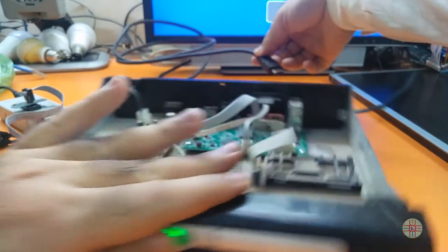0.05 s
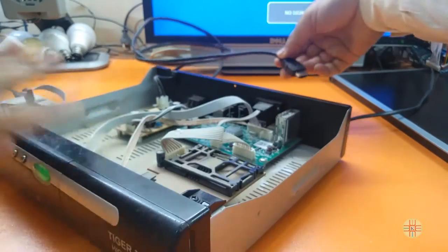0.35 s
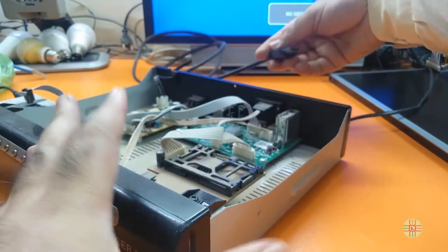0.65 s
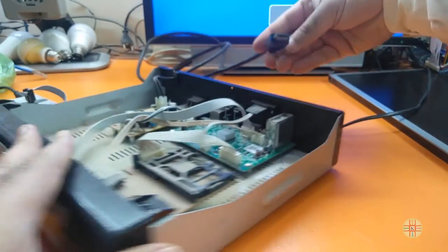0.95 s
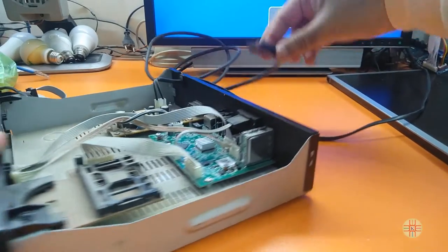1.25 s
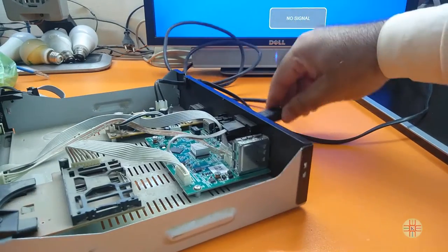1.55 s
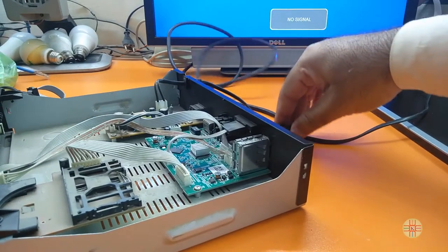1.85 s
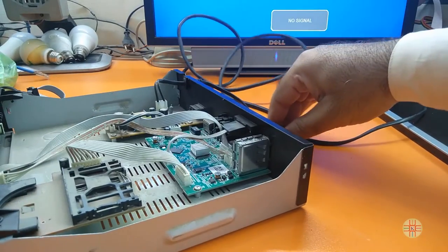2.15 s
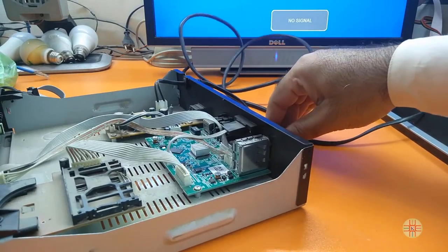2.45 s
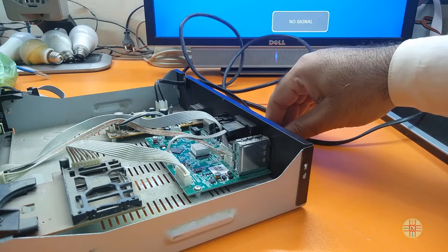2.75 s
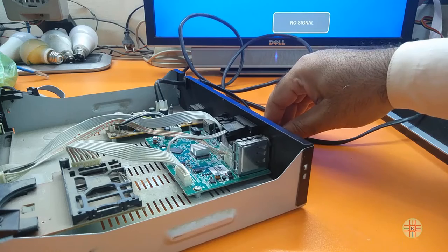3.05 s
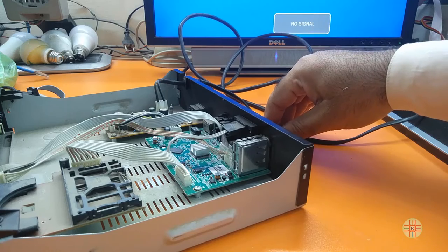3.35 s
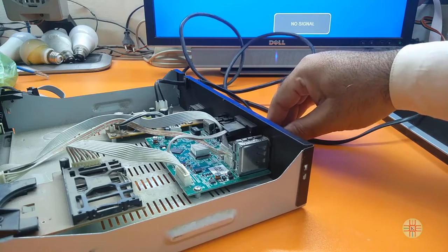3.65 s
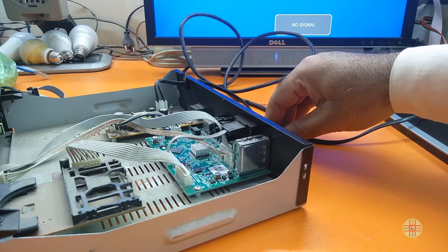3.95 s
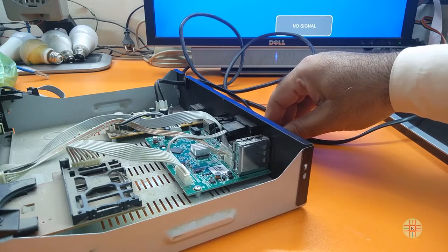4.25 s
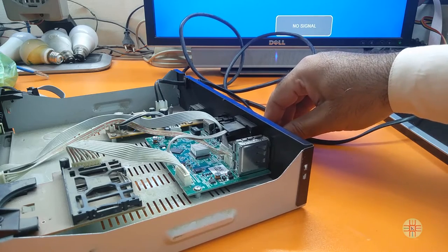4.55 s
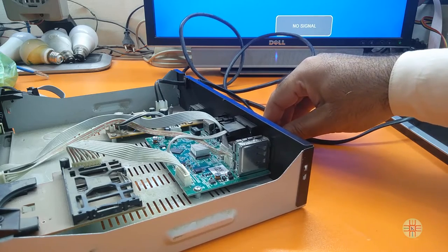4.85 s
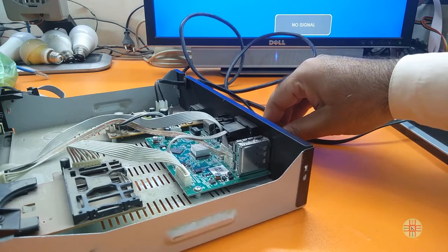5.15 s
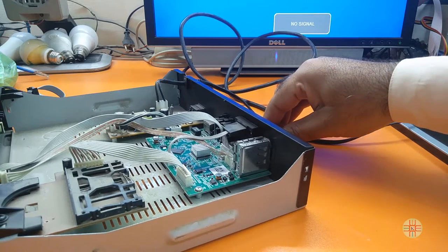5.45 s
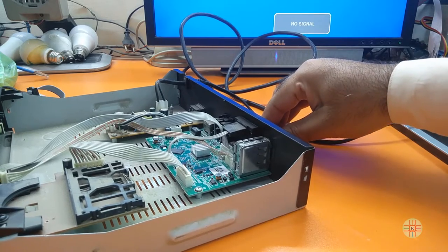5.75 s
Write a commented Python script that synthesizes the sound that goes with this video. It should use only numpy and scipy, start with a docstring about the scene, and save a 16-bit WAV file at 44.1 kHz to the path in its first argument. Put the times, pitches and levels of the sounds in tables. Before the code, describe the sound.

Close up in a small, quiet room, a thin metal case is shoved round on a bench in two short scrapes, with clattering knocks and a brief ring. Muffled thumps come through the microphone stand. After that, a metal plug feels for its socket with sparse, light taps and scuffs, ending in a sharper click and a low knock over faint handling rumble.

```python
"""Receiver turned and plugged in

An opened sheet-steel receiver is turned on a laminate bench in a small room. Its feet scrape and
judder; the chassis drops, rattles and rings. Dull bumps reach the microphone through its holder.
A plug ticks along the back panel, feeling for a socket, and seats with a knock.
Underneath: handling rumble, room air and a faint hiss."""
import sys
import numpy as np
from scipy import signal
from scipy.fft import rfft, irfft
from scipy.io import wavfile

SR = 44100
rng = np.random.default_rng(int(sys.argv[2]) if len(sys.argv) > 2 else 0)


def log_audio(samples):
    """Write samples as a 16-bit WAV file to the path given in sys.argv[1]."""
    # one column per channel
    frames = np.atleast_2d(samples).T
    # limit to full scale, then quantise
    limited = np.clip(frames, -1, 1)
    pcm = np.round(limited * 32767).astype(np.int16)
    wavfile.write(sys.argv[1], SR, pcm)


N = 256662
TIME_S = np.arange(N) / SR

# Chassis blows, the last is the plug seating; levels before trim: (time [s], contact [s], strength [dB],
# weight [dB], hardness [dB], low spot resonance [Hz], high spot resonance [Hz], thud [dB])
CHASSIS_KNOCKS = [(0.115, 0.012, -39.5, 2.5, -5, 770, 1270, -41.5),
                  (0.214, 0.0026, -39, 10, -12.5, 278, 2320, -22.5),
                  (0.229, 0.0049, -42, 5, -4, 297, 2420, -23.5),
                  (0.2464, 0.0024, -31, 5, -13, 560, 1300, -44),
                  (0.288, 0.0036, -51, 12.5, 6, 280, 1653, -30.5),
                  (0.302, 0.0019, -32.5, 0, -13.5, 840, 2830, -43.5),
                  (0.321, 0.0032, -40.5, 11, -7, 403, 1740, -52),
                  (0.568, 0.0033, -39.5, 3.5, -21, 364, 1670, -41.5),
                  (0.628, 0.0078, -61.5, 14.5, -6.5, 240, 1475, -49),
                  (0.718, 0.0088, -45, 0, -12, 318, 2100, -43),
                  (0.843, 0.0016, -41, -30, -5, 870, 2240, -58),
                  (0.873, 0.0048, -58.5, 10, -14, 280, 1300, -45),
                  (1.248, 0.0028, -36.5, 4.5, -6.5, 408, 1980, -54),
                  (1.318, 0.0024, -42, 5, -24, 250, 1470, -41),
                  (1.342, 0.02, -57, 16.5, 0.5, 369, 1290, -49.5),
                  (1.601, 0.014, -55, 9.5, 2, 319, 2700, -25.5),
                  (5.416, 0.0011, -49.5, 20, -17.5, 376, 2040, -42.5)]
# Plug and cable on the panel, long contacts rub, short ones click; levels before trim: (time [s],
# contact [s], strength [dB], weight [dB], hardness [dB], low spot resonance [Hz], high spot resonance [Hz])
PLUG_TAPS = [(1.517, 0.009, -63.5, -30, 5, 700, 3130), (1.568, 0.0011, -69, -6, 10.5, 400, 3000),
             (1.616, 0.0072, -47.5, -1, -12, 686, 2740), (1.662, 0.14, -66.5, -19, -5, 703, 2020),
             (2.036, 0.007, -66.5, 6, -13, 396, 2500), (2.148, 0.061, -66, -32, -5, 382, 1660),
             (2.21, 0.0091, -67.5, -20, 3, 405, 1690), (2.275, 0.0086, -39.5, -5.5, -14, 760, 1990),
             (2.404, 0.002, -41, -8.5, -17, 492, 1510), (2.68, 0.0067, -74, 26.5, -8, 380, 420),
             (2.719, 0.014, -67.5, 10, -12, 910, 1870), (2.861, 0.013, -59, -32, -19, 570, 1840),
             (3.114, 0.022, -66, -8.5, -8, 500, 1860), (3.158, 0.0055, -67, 14, -12, 527, 1880),
             (3.36, 0.012, -57, 0, -10.5, 493, 1796), (3.607, 0.026, -64.5, 2.5, -16.5, 950, 1850),
             (3.804, 0.016, -49.5, -6, -23.5, 940, 1780), (4.017, 0.018, -59.5, 2.5, -17.5, 538, 1870),
             (4.213, 0.024, -58.5, 1.5, -25, 970, 1870), (4.293, 0.014, -48.5, -1.5, -28.5, 710, 2030),
             (4.553, 0.01, -48, -2.5, -13.5, 574, 2070), (4.998, 0.0049, -45, -8, -10.5, 490, 2020),
             (5.002, 0.0022, -32.5, -12, -10, 516, 2170), (5.013, 0.0027, -42.5, 0.5, -25, 333, 2840),
             (5.247, 0.0092, -63, -1.5, -7.5, 950, 1860), (5.311, 0.008, -63, -27, -7.5, 400, 2670)]
# Thud, knock, clack, tick and snap bands: (low edge [Hz], high edge [Hz])
IMPACT_BANDS = [(40, 200), (200, 1100), (1100, 3500), (3500, 8000), (8000, 15500)]
# Chassis and back panel modes: (frequency [Hz], gain [dB], t60 [s])
CHASSIS_MODES = [(82.53, 2.5, 0.54), (148.1, -9, 0.63), (283.2, -4.5, 0.38), (372, -4, .3),
                 (460, -19.5, 0.083), (541.7, -2.5, 0.2), (743, -8, 0.24), (887, -23, 0.49),
                 (1276, -21, 0.16), (1350, -24.5, .15), (1580, -23.5, 0.19), (1826, -15.5, 0.28),
                 (1940, -4, 0.054), (2160, -24, 0.12), (2780, -20.5, 0.072), (6060, -36.5, .1),
                 (6140, -33, .1)]
PANEL_MODES = [(92.2, 10.5, .4), (371, -1, 0.16), (509.7, -4.5, 0.15), (566, -4, 0.085), (707, -10, 0.087),
               (951, -2.5, 0.14), (1430, -14, 0.028), (1538, -7, 0.071), (1868, -4.5, 0.08),
               (1945, -11, 0.057), (2340, -36, 0.07), (2460, -13, 0.045), (2740, -18.5, .05),
               (2910, -6.5, 0.06), (4700, -19, 0.045), (5920, -8.5, .04), (6480, -19, 0.043),
               (6360, -18, .04)]
# Spectra of their dense, short-lived modes: (frequency [Hz], gain [dB])
CHASSIS_CLATTER_EQ = [(40, -14.5), (90, 7), (200, -0.5), (370, 4), (700, -1.5), (1050, -9.5), (2000, -12),
                      (3000, -17.5), (3800, -24), (5000, -19), (6600, -15.5), (8500, -38.5), (12500, -35),
                      (15500, -53.5)]
PANEL_CLATTER_EQ = [(40, -19), (100, -8), (230, -13.5), (480, 0), (950, -9), (1170, -15), (1850, -4.5),
                    (3050, -13), (3450, -17.5), (5000, -16.5), (7000, -15), (8200, -28.5), (12000, -29),
                    (15500, -46.5)]
# Hand pushes, per slide: (start [s], length [s], level before trim [dB], grip [dB])
SLIDE_PUSHES = [
    [(-0.04, 0.19, -43.5, 5.5), (0.2, 0.17, -44.5, -1.5)],
    [(0.73, 0.093, -65, 4.5), (0.85, 0.57, -52, 0.5), (1.01, 0.195, -50, 3)],
]
# Scrape spectrum, per slide: (frequency [Hz], gain [dB])
SLIDE_EQS = [
    [(29, -42.5), (50, -27.5), (91, -5), (144, -4), (216, -0.5), (295, -11), (367, -0.5), (637, -8),
     (790, 1), (981, -17), (1280, -12.5), (1740, -17.5), (6530, -33), (12800, -36.5), (15500, -45)],
    [(29, -20), (50, -5), (140, 1.5), (192, -11), (227, -3), (303, -17), (375, -7.5), (501, -5.5),
     (735, -1.5), (870, -9), (2170, 3.5), (3420, -18.5), (6230, -14), (7540, -24.5), (15500, -32)],
]
# Case resonances, per slide: (frequency [Hz], width [Hz], gain [dB])
SLIDE_RESONANCES = [
    [(235.2, 56, 1), (372, 33, -4), (818, 38, -3), (1035, 110, 3.5), (1270, 79, -4.5), (2456, 100, 1.5),
     (5930, 1300, 13.5)],
    [(254.7, 55, -11), (375, 89, 17.5), (570, 49, 10), (763, 44, -9.5), (2100, 580, -16), (2690, 150, 0),
     (5860, 2100, -4.5)],
]
# Holder bumps: (time [s], level [dB], frequency [Hz], rise [s])
HOLDER_BUMPS = [(1.815, -24.5, 155.3, 0.0075), (1.866, -10.5, 263, 0.0027), (1.876, -17, 141, 0.0064),
                (1.906, -16.5, 145, .0036), (1.929, -16.5, 102, 0.0069), (1.954, -10, 83.4, .0085),
                (1.981, -18.5, 151, 0.004), (2.034, -26.5, 119.6, .009)]
# Hand and cable shoving the case: (start [s], length [s], level [dB])
CASE_SHOVES = [(0.175, 0.23, -40.5), (0.854, 0.15, -47), (1.845, 0.11, -26), (2.414, 0.068, -49),
               (3.134, 0.066, -54), (3.592, 0.28, -57), (4.962, 0.71, -57.5)]
# Handling rumble and room air spectra: (frequency [Hz], gain [dB])
RUMBLE_EQ = [(20, -17), (45, 1), (60, -3), (92, 1.5), (130, -4), (200, -17.5), (400, -34), (900, -60)]
AIR_EQ = [(15, -45.5), (25, -3.5), (104, -10), (169, -17), (378, -12.5), (445, -15), (582, -18),
          (1020, -22.5), (1110, -21.5), (1340, -24), (15500, -40)]
# Room decay: (frequency [Hz], t60 [s])
ROOM_DECAY = [(100, 0.8), (300, 0.34), (800, 0.35), (2000, 0.3), (6000, 0.41), (14000, 0.24)]


def chassis():
    """The case drops on its feet, rattles, and is knocked by the hand and the seating plug."""
    out = np.zeros(N)
    for time_s, *contact, thud_db in CHASSIS_KNOCKS:
        add(out, time_s, strike(
            contact, thud_db, CHASSIS_MODES, CHASSIS_CLATTER_EQ, detune=0.0019,
            crack_db=-3.5, clatter_t60_s=0.057, clatter_room_db=-0.5,
            ring_db=-1.5, ring_db_per_decade=-0.5, ring_room_db=-23,
            spot_mode_db=9.5, spot_db=-1.5, spot_q=6.5, trims_db=[-0.5, -0.3, -0.3, -0.98, -0.8]))
    return out


def plug():
    """The metal plug shell scuffs round the socket rim; pressing fingers detune the panel."""
    out = np.zeros(N)
    for time_s, *contact in PLUG_TAPS:
        _, strength_db, weight_db, *_ = contact
        thud_db = strength_db + weight_db - 8  # a tap barely moves the case
        add(out, time_s, strike(
            contact, thud_db, PANEL_MODES, PANEL_CLATTER_EQ, detune=0.012,
            crack_db=-7.5, clatter_t60_s=0.15, clatter_room_db=-7.5,
            ring_db=0.5, ring_db_per_decade=8.5, ring_room_db=-3,
            spot_mode_db=14.5, spot_db=3, spot_q=4.8, trims_db=[-3.5, -5.5, -2.5, -4, -2.5]))
    return out


def strike(contact, thud_db, modes, clatter_eq, detune, crack_db, clatter_t60_s, clatter_room_db,
           ring_db, ring_db_per_decade, ring_room_db, spot_mode_db, spot_db, spot_q, trims_db):
    """One contact drives clatter and ringing modes, coloured by the spot struck, echoed by the room."""
    contact_s, strength_db, weight_db, hard_db, *spots_hz = contact
    t = np.arange(28000) / SR
    force = contact_force(contact_s)
    force = np.pad(force, (0, len(t) - len(force)))
    rise = np.sin(np.pi / 2 * np.minimum(t / (contact_s + 0.0016), 1)) ** 2
    echoes = band(room_tail(), 200, 15500) * rise * (1 - np.exp(-t / 0.0013))

    burst = rng.standard_normal(len(t)) * rise * amp(-60 * t / (clatter_t60_s + 2 * contact_s))
    drive = amp(crack_db) * force + burst / np.linalg.norm(burst) + amp(clatter_room_db) * echoes
    clatter = colour(drive, clatter_eq)
    clatter += amp(spot_db) * sum(resonate(clatter, hz, spot_q) for hz in spots_hz)

    ring = np.zeros(len(t))
    for (hz, db, t60_s), shift in zip(modes, rng.standard_normal(len(modes))):
        # modes with an antinode at the spot ring most
        nearness = sum(np.exp(-(np.log(hz / spot_hz) / 0.068) ** 2) for spot_hz in spots_hz)
        envelope = amp(db + spot_mode_db * nearness - 60 * t / t60_s)
        ring += envelope * np.sin(2 * np.pi * hz * (1 + detune * shift) * t)
    ring = signal.fftconvolve(ring, force + amp(ring_room_db) * echoes)[:len(t)]
    ring_gain = amp(ring_db + ring_db_per_decade * np.log10(contact_s / 0.0011))
    sound = unit(clatter) + ring_gain * unit(ring)

    tick_db = strength_db + hard_db
    snap_db = tick_db - 9.5 - 13.5 * np.log10(contact_s / 0.0023)  # longer contacts snap less
    levels_db = np.add([thud_db, strength_db + weight_db, strength_db, tick_db, snap_db], trims_db)
    parts = [band(sound, low_hz, high_hz, order=5) for low_hz, high_hz in IMPACT_BANDS]
    attack = t < contact_s + 0.03
    return sum(amp(db) * part / part[attack].std() for db, part in zip(levels_db, parts))


def contact_force(contact_s):
    """A swell of tiny slips: unit energy, near-flat spectrum."""
    swell = signal.windows.tukey(int(contact_s * SR) + 2, 0.8)
    force = swell * rng.standard_normal(len(swell))
    for _ in range(5):
        spectrum = rfft(force, 2 * len(swell))
        whitened = irfft(spectrum / (abs(spectrum) + 1e-12))
        force = swell * whitened[:len(swell)]
    return force / np.linalg.norm(force)


def slide(pushes, scrape_eq, resonances, slips_per_s=2500, rise_s=0.012):
    """Tiny slips of the feet shake the case and its panels sing; more grip, more judder."""
    slips = rng.standard_normal(N) * (rng.random(N) < slips_per_s / SR)
    slips = unit(slips * amp(-1.5 * np.minimum(rng.exponential(1, N), 4)))
    drive = slips + signal.oaconvolve(slips, room_tail())[:N]
    singing = sum(amp(db) * resonate(drive, hz, hz / width_hz) for hz, width_hz, db in resonances)
    scrape = colour(drive + singing, scrape_eq)

    def layer(low_hz, high_hz, trim_db, grip_share, fade_db_per_s):
        gains = [amp(db + trim_db + grip_share * grip_db) * push(start_s, length_s, rise_s, fade_db_per_s)
                 for start_s, length_s, db, grip_db in pushes]
        return unit(band(scrape, low_hz, high_hz)) * np.max(gains, axis=0)

    judder = layer(150, 1100, trim_db=1.5, grip_share=1, fade_db_per_s=200)
    rasp = layer(1100, 3500, trim_db=-0.5, grip_share=0.7, fade_db_per_s=139)
    hiss = layer(3500, 15500, trim_db=1.2, grip_share=0, fade_db_per_s=207)
    return judder + rasp + hiss


def push(start_s, length_s, rise_s, fade_db_per_s):
    """Gain of one hand movement: rise, hold, fade."""
    t = TIME_S - start_s
    return np.clip(t / rise_s, 0, 1) * amp(-fade_db_per_s * np.maximum(t - length_s, 0))


def holder_bumps(overtone_ratio=1.95, cutoff_hz=600, room_db=-25):
    """Soft pushes through the holder: two heavily damped modes and a muffled rub."""
    out = np.zeros(N)
    t = np.arange(SR // 5) / SR
    for time_s, db, hz, rise_s in HOLDER_BUMPS:
        rub = unit(band(rng.standard_normal(len(t)), 40, 260, order=2))
        phase = 2 * np.pi * hz * t
        sway = np.sin(phase) + amp(-14) * np.sin(overtone_ratio * phase)
        envelope = (t / rise_s * np.exp(1 - t / rise_s)) ** 1.01
        add(out, time_s, amp(db) * envelope * (sway + amp(-17) * rub))
    out = signal.sosfilt(signal.butter(6, cutoff_hz, fs=SR, output="sos"), out)
    return out + amp(room_db) * signal.oaconvolve(out, room_tail())[:N]


def handling_rumble(floor_db=-53.5, settle_db_per_s=3):
    """The case rumbles with each shove, over a floor that sinks as the hands settle."""
    shoves = [amp(db) * push(start_s, length_s, rise_s=0.029, fade_db_per_s=122)
              for start_s, length_s, db in CASE_SHOVES]
    floor = amp(floor_db - settle_db_per_s * TIME_S)
    rumble = band(colour(rng.standard_normal(N), RUMBLE_EQ), 9.4, 2500, order=1)
    return unit(rumble) * np.max([floor, *shoves], axis=0)


def room_air(air_db=-73.5, hiss_db=-71.5, hiss_fade_db_per_s=2.5):
    """Steady air and a faint, fading high hiss."""
    air = colour(rng.standard_normal(N), AIR_EQ)
    air /= band(air, 130, 15000).std()
    hiss = unit(band(rng.standard_normal(N), 7000, 19000))
    return amp(air_db) * air + amp(hiss_db - hiss_fade_db_per_s * TIME_S) * hiss


def room_tail(size=28000):
    """Diffuse echoes of unit energy; the bass lasts longest."""
    hz, t, spectra = signal.stft(rng.standard_normal(size), SR, nperseg=256)
    decay = amp(-60 * t / log_interp(ROOM_DECAY, hz)[:, None])
    echoes = signal.istft(spectra * decay, SR, nperseg=256)[1][:size]
    return echoes / np.linalg.norm(echoes)


def amp(db):
    return 10 ** (np.asarray(db) / 20)


def unit(x):
    """Scale to rms 1."""
    return x / np.sqrt(np.mean(x ** 2) + 1e-20)


def log_interp(points, hz):
    """Table lookup on a log-frequency axis."""
    points_hz, values = np.transpose(points)
    return np.interp(np.log(hz + 1), np.log(points_hz + 1), values)


def add(mix, time_s, sound):
    part = mix[round(time_s * SR):][:len(sound)]
    part += sound[:len(part)]


def band(x, low_hz, high_hz, order=3):
    return signal.sosfilt(signal.butter(order, [low_hz, high_hz], "band", fs=SR, output="sos"), x)


def resonate(x, hz, q):
    return signal.lfilter(*signal.iirpeak(hz, q, SR), x)


def colour(x, eq, size=4096):
    """Minimum-phase filter with the given spectrum."""
    hz = abs(np.fft.fftfreq(size, 1 / SR))
    log_gain = np.log(amp(log_interp(eq, hz)))
    response = np.exp(np.conj(signal.hilbert(log_gain)))
    taps = np.fft.ifft(response).real[:size // 2]
    return signal.oaconvolve(x, taps)[:len(x)]


def scene():
    """Case, plug, holder and room, close up in mono."""
    slides = sum(map(slide, SLIDE_PUSHES, SLIDE_EQS, SLIDE_RESONANCES))
    return (chassis() + plug() + slides + holder_bumps() + handling_rumble() + room_air())[None]


def record(dry, cutoff_hz=15650):
    """Steep low-pass."""
    taps = signal.firwin(511, cutoff_hz, window=("kaiser", 9), fs=SR)
    return signal.oaconvolve(dry, taps[None], "same")


dry = scene()
out = record(dry)
log_audio(out)
```